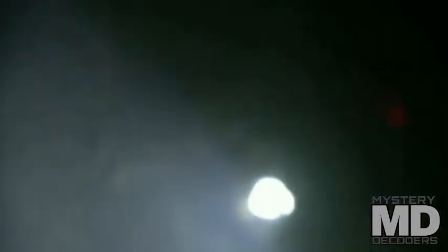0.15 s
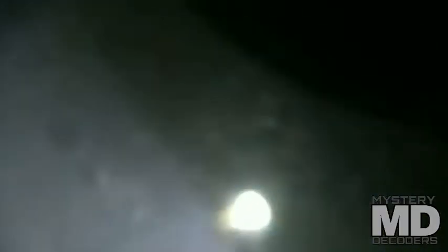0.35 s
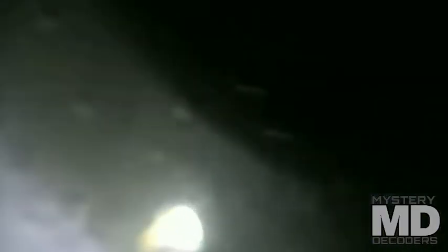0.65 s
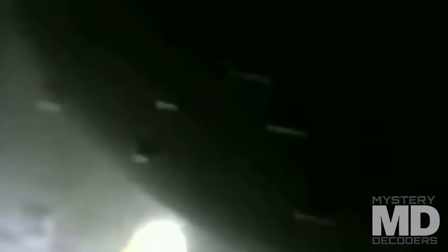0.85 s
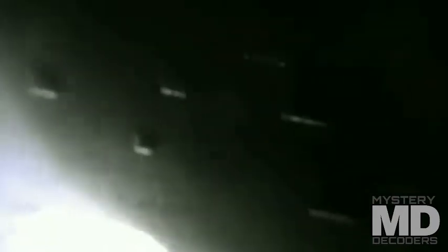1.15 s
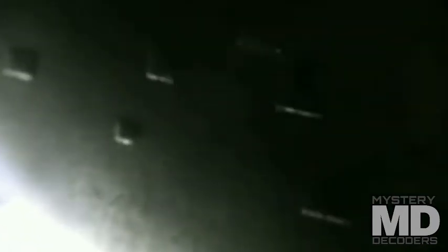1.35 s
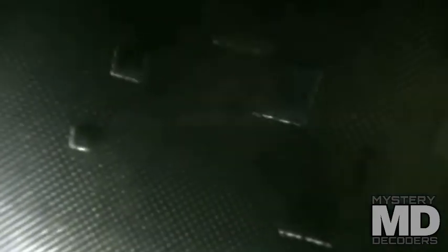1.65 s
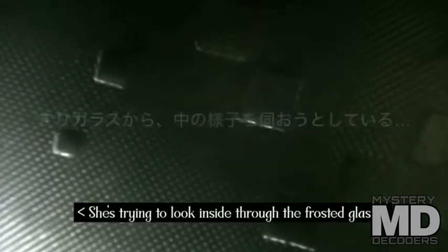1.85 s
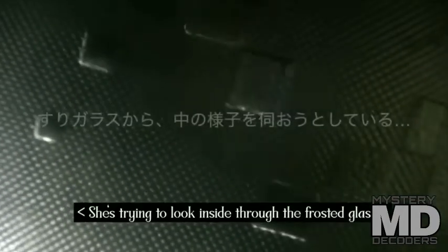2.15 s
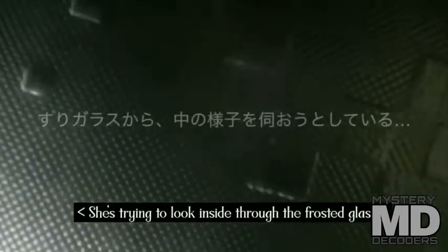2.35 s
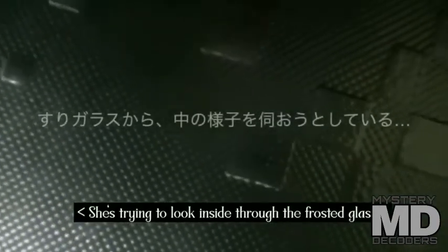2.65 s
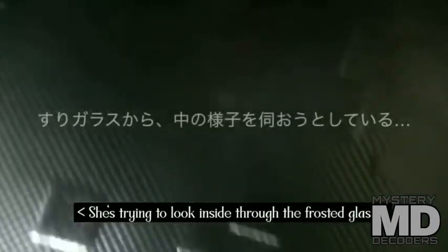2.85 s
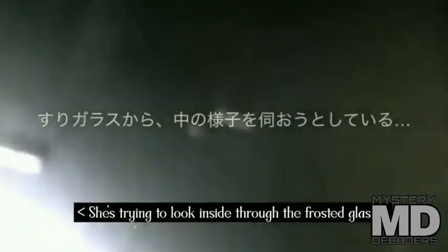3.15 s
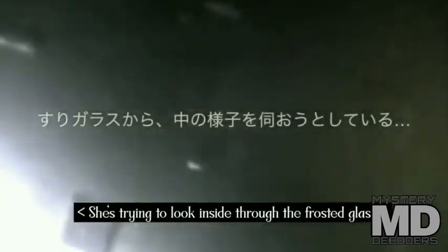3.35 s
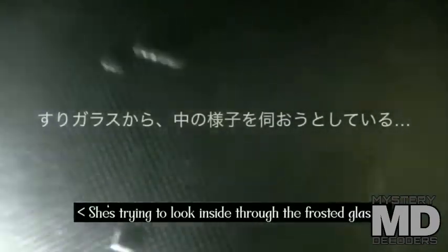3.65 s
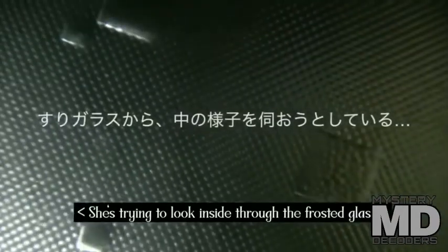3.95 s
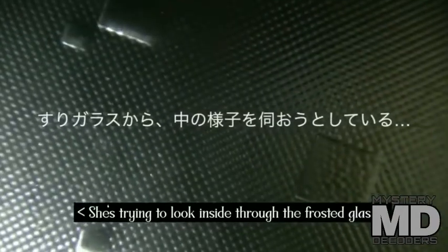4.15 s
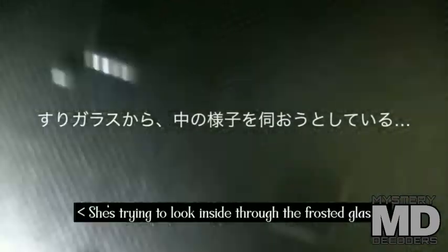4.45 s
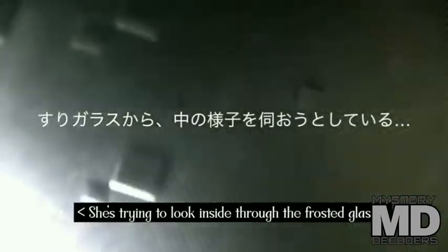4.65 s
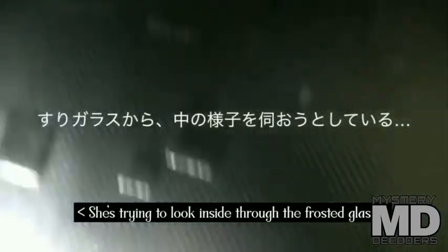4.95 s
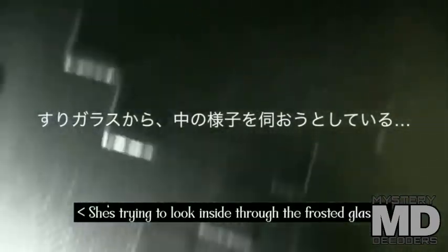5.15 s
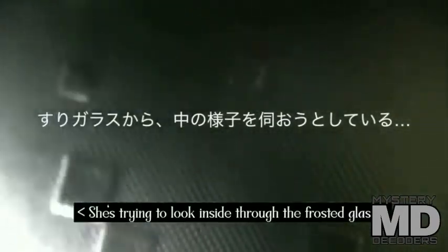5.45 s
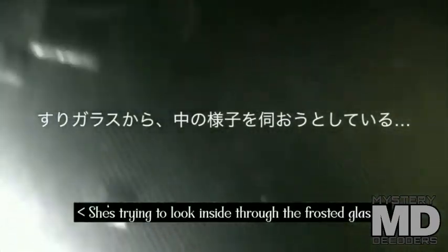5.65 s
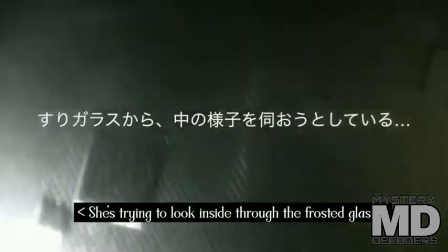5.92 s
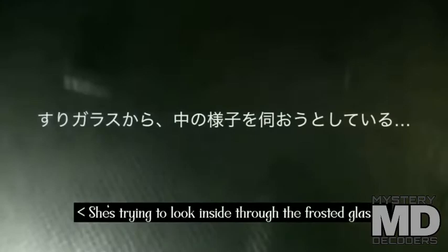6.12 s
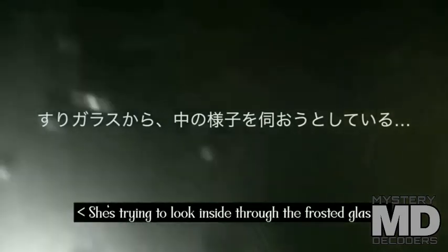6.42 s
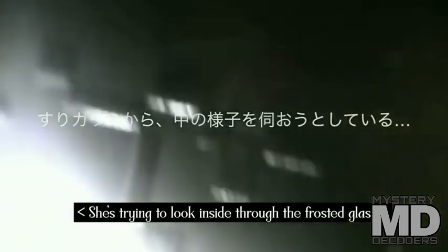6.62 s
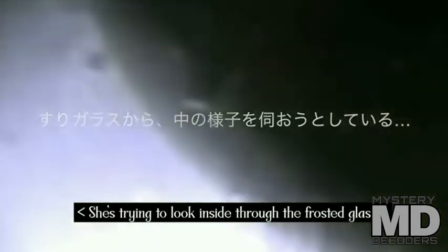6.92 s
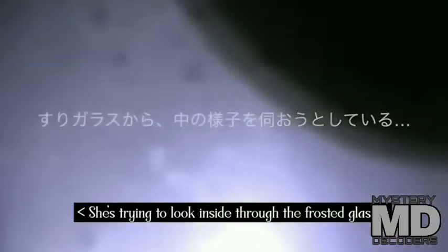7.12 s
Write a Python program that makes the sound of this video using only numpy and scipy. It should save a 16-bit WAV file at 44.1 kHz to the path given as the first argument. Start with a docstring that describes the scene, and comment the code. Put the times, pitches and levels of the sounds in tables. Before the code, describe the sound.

In a quiet building, someone tugs at a wooden sliding door right by the microphone. A slight stir gives way to a burst of hollow thuds, wooden clatter and rattling glass. After some gentler jiggling, the door is jolted hard three more times, its loose pane clicking and dragging. Dull room noise, deep handling rumble and a faint rustle and hiss lie underneath and remain when the door settles.

```python
"""Dull building noise, handling rumble, rustle and faint hiss lie under a close wooden sliding door.
The door stirs, then at 0.7 s is shaken and bumped hard: the panel booms in its low modes, the frame
clatters and a loose glass pane ticks and drags in its groove. Softer shaking follows from 2 s,
then hard bouts near 3.6, 4.9 and 5.8 s. The door rings out and the background remains."""
import sys
import numpy as np
from scipy import signal
from scipy.io import wavfile
from scipy.ndimage import uniform_filter1d

SR = 44100
rng = np.random.default_rng(int(sys.argv[2]) if len(sys.argv) > 2 else 0)


def int16_out(signal):
    """Quantize to a 16-bit WAV file."""
    q = np.round(np.clip(np.atleast_2d(signal).T, -1, 1) * 32767)
    wavfile.write(sys.argv[1], SR, q.astype(np.int16))


N = 321048


def from_db(db):
    """Decibels to gain."""
    return 10 ** (np.asarray(db) / 20)


def rms_one(x):
    """Scale to rms 1."""
    return x / np.sqrt(np.mean(x ** 2) + 1e-20)


def bandpass(x, order, edges_hz):
    """Butterworth band filter."""
    return signal.sosfilt(signal.butter(order, edges_hz, "band", fs=SR, output="sos"), x + 1e-18)


def ring(force, hz, t60):
    """One mode: a unit click sets a sine of height 1 ringing."""
    r, w = from_db(-60 / (t60 * SR)), 2 * np.pi * hz / SR
    return signal.lfilter([0, np.sin(w)], [1, -2 * r * np.cos(w), r * r], force + 1e-18)


def colour(x, spectrum):
    """Third-octave EQ that keeps white noise at about the same rms."""
    hz, level_db = np.transpose(spectrum)
    edges = np.geomspace(hz[0], hz[-1], int(3 * np.log2(hz[-1] / hz[0])) + 1)
    gains = from_db(np.interp(np.log(edges[1:] * edges[:-1]) / 2, np.log(hz), level_db))
    gains /= np.sqrt(np.sum(gains ** 2 * np.diff(edges)) * 2 / SR)
    return sum(gain * (-1) ** k * bandpass(x, 2, edges[k:k + 2]) for k, gain in enumerate(gains))


def grains(per_s, spread_db):
    """Random contacts of uneven size and sign, at rms 1."""
    sizes = from_db(spread_db * np.minimum(rng.exponential(1, N), 4)) * rng.choice([-1, 1], N)
    return rms_one(sizes * (rng.random(N) < per_s / SR))


def flicker(rate_hz, depth_db):
    """A gain that wanders at random."""
    hop = 32
    lowpass = signal.butter(2, rate_hz, fs=SR / hop, output="sos")
    wander = rms_one(signal.sosfilt(lowpass, rng.standard_normal(N // hop + 2)))
    return from_db(depth_db * np.interp(np.arange(N) / hop, np.arange(len(wander)), wander))


# Dull room tone: freq_hz, relative_db
BUILDING_EQ = [(35, -37), (60, -7), (197, -5.5), (234, -9), (447, -6.5), (661, -3.5), (719, -21),
               (1030, -7), (2070, -25.5), (3500, -46), (4550, -58), (7700, -120)]
# Hollow notes in the room tone: pitch_hz, gain_db, t60_s
BUILDING_MODES = [(631, -51, 0.11), (1093, -51.5, 0.087), (1270, -49.5, 0.18)]
def building_noise():
    """Dull noise excites faint hollow resonances."""
    air = colour(rng.standard_normal(N), BUILDING_EQ)
    air += sum(from_db(gain_db) * ring(air, hz, t60) for hz, gain_db, t60 in BUILDING_MODES)
    return flicker(16.2, 0.52) * rms_one(air)


def handling_rumble(floor_db, force):
    """Deep rumble swells with the shaking and lingers after it."""
    band_hz, linger_t60_s = [28, 58], 1.13
    power_decay = from_db(-120 / (linger_t60_s * SR))
    linger = np.sqrt(signal.lfilter([10 / SR], [1, -power_decay], force ** 2 + 1e-18))
    bed = rms_one(bandpass(rng.standard_normal(N), 3, band_hz))
    swell = bandpass(force * rng.standard_normal(N), 3, band_hz)
    return (from_db(floor_db) + from_db(-29) * linger) * bed + from_db(-6) * swell


# Fader moves of the background: time_s, building_db, rustle_db, rumble_db
BED_FADERS = [(0.0, -57.5, -75, -60), (0.2, -52, -59, -67), (0.37, -56.5, -66, -74), (0.45, -55, -67, -67),
              (1.0, -52.5, -68.5, -46), (1.3, -49.5, -75.5, -54.5), (1.5, -53, -71.5, -56),
              (2.0, -56, -77.5, -64.5), (3.38, -56.5, -72, -57.5), (4.0, -51.5, -66, -66),
              (4.12, -57, -72.5, -51), (4.25, -60, -61.5, -54), (4.4, -54.5, -62.5, -52),
              (4.45, -56.5, -76, -58), (4.65, -54, -74, -58), (4.8, -61, -73, -59),
              (5.3, -57.5, -79.5, -65), (5.5, -53.5, -72, -58), (5.62, -53.5, -74, -60),
              (6.15, -53, -64, -43), (6.43, -55, -74.5, -63), (7.28, -58.5, -68.5, -60)]
def background(force):
    """Room tone and rumble, with a grainy rustle and faint hiss on top."""
    time_s, *faders = np.transpose(BED_FADERS)
    building_db, rustle_db, rumble_db = [np.interp(np.arange(N) / SR, time_s, db) for db in faders]
    lows = from_db(building_db) * building_noise() + handling_rumble(rumble_db, force)
    rustle = rms_one(bandpass(grains(4000, spread_db=-5), 2, [1500, 4500])) * flicker(25, 0.53)
    hiss_eq = [(1180, -34), (2000, -13), (3430, -33.5), (4710, 9), (15500, 3)]  # freq_hz, relative_db
    hiss = colour(rng.standard_normal(N), hiss_eq) * flicker(3, 0.28)
    return lows + from_db(rustle_db) * rustle + from_db(-72.5) * hiss


# Bouts of shaking: start_s, rise_s, hold_s, force_db, release_db_per_s, clatter_offset_db, favoured_hz
SHAKE_BOUTS = [(0.261, 0.088, 0.026, -46.5, 399.5, 11, 345), (0.708, 0.0032, 0.1, -15, 248, -4, 206),
               (0.849, 0.0051, 0.018, -22.5, 109.5, -14, 156), (1.968, 0.044, 0.1, -44, 200, -6.5, 362),
               (2.073, 0.12, 0.09, -32.5, 193, -2.5, 195), (2.564, 0.073, 0.032, -30, 198, 0, 327),
               (2.7, 0.073, 0.025, -27.5, 702, -1.5, 212), (3.565, 0.0014, 0.13, -14.5, 235, -3, 233),
               (3.741, 0.0011, 0.022, -20, 142, -7, 250), (4.12, 0.03, 0.27, -48.5, 115.5, -1, 175),
               (4.47, 0.17, 0.0088, -46, 405.5, -27, 223), (4.923, 0.0047, 0.04, -18, 146, -16, 204),
               (5.804, 0.001, 0.06, -15.5, 162.5, -13, 172), (5.987, 0.0029, 0.097, -35.5, 215, -2.5, 185)]
def hand_shakes():
    """Each bout swells, holds and is let go; gives panel force, frame clatter and favoured pitch."""
    swell_db, clatter_loss_db_per_s, rest_hz, sag_s = 14.5, 73, 118, 0.11
    curves, t = np.zeros((3, N)), np.arange(SR) / SR
    for start, rise, hold, force_db, release, clatter_db, favoured_hz in SHAKE_BOUTS:
        at, since_release = round(start * SR), np.maximum(t - rise - hold, 0)
        force = from_db(force_db - swell_db * np.maximum(1 - t / rise, 0) - release * since_release)
        # once let go, the clatter dies first and the pitch sinks to that of the free door
        clatter = force * from_db(clatter_db - clatter_loss_db_per_s * since_release)
        pitch = rest_hz + (favoured_hz - rest_hz) * np.exp(-since_release / sag_s)
        curves[:, at:at + SR] += force, clatter, force * pitch
    force, clatter, weighted_pitch = curves
    return force, clatter * flicker(29, 1.2), weighted_pitch / (force + 1e-20)


def nearness(hz, favoured_hz, octaves):
    """Where the door is held or struck decides which modes answer: those near the favoured pitch."""
    return 1 / (1 + (np.log2(hz / np.maximum(favoured_hz, 1)) / octaves) ** 2)


# Modes of the wooden panel: pitch_hz, gain_db, t60_s
PANEL_MODES = [(59.5, -3, 0.23), (113.6, -4.5, 0.6), (147.6, 2.5, 0.2), (167.1, -1.5, 0.13),
               (177.4, -5, 0.39), (203.4, -0.5, 0.17), (247.2, 1, 0.13), (278, -2.5, 0.25), (312.6, 5, 0.1),
               (364.3, 5.5, 0.15), (514, -9, 0.1), (449, -5, 0.12), (576, 4, 0.015), (589, -18, 0.067),
               (666.3, -10, 0.14), (786, -13, 0.2), (1028, -6.5, 0.062), (1153, -8.5, 0.058)]
def panel_boom(force, clatter, ticks, favoured_hz):
    """Rough shaking drives the twelve low modes; clatter and ticks knock the upper ones."""
    rough, boom = rng.standard_normal((2, N)), np.zeros(N)
    for k, (hz, gain_db, t60) in enumerate(PANEL_MODES):
        if k < 12:
            drive = from_db(-37) * force * nearness(hz, favoured_hz, octaves=0.73) * rough[k % 2]
        else:
            drive = from_db(-36) * clatter * rough[k % 2] + from_db(-24) * ticks
        boom += (-1) ** k * from_db(gain_db) * ring(drive, hz, t60)
    return boom


# Woody tone of the frame: freq_hz, relative_db
FRAME_EQ = [(240, -40), (400, 2.5), (912, -3.5), (1140, -6), (3600, -18.5), (5000, -24), (6500, -44),
            (11000, -120)]
def frame_clatter(clatter, ticks):
    """The frame sounds under its own rattling contacts and under every tick of the pane."""
    rattle = from_db(-10.5) * clatter * grains(1500, spread_db=3)
    return colour(rattle + from_db(-1) * ticks, FRAME_EQ)


# The door hits its frame: start_s, level_db, favoured_hz, crack_offset_db
DOOR_HITS = [(0.716, -6.5, 199, -3.5), (0.734, -11.5, 393, -21), (0.789, -6.5, 203, -13),
             (0.858, -32, 170, 2), (0.88, -17.5, 173, -10), (0.907, -15.5, 132, -44),
             (2.195, -27, 413, 6.5), (2.22, -22, 174, -39), (2.24, -30, 202, -20), (2.297, -24, 182, -32),
             (2.612, -32, 324, -25), (2.746, -30.5, 149, -21), (2.776, -18.5, 264, -9),
             (2.793, -21.5, 166, -12), (3.543, -31, 325, 4), (3.57, -8, 300, -1), (3.61, -9.5, 264, -10),
             (3.627, -9.5, 199, -12), (3.641, -11, 240, -10.5), (3.747, -9.5, 278, -15),
             (3.838, -14, 114, -17), (3.97, -23.5, 270, -7.5), (3.994, -18.5, 120.4, -37),
             (4.249, -36.5, 280, -5), (4.541, -48, 294, 0), (4.931, -16, 216, -8),
             (4.96, -16, 161.5, -10.5), (5.03, -27.5, 165.5, -8.5), (5.07, -27.5, 172, -5),
             (5.734, -48.5, 404, 6.5), (5.808, -4, 155.5, -24.5), (5.823, -24, 164, -3),
             (5.878, -13.5, 148, -13.5), (5.978, -15.5, 236, -19), (6.011, -13, 189, -17),
             (6.042, -15.5, 230, -5.5), (6.186, -51.5, 404, 8.5)]
def door_bumps():
    """A bump strikes every panel mode, with a hard snap and a brief crack at the front."""
    held_t60_share, choke_db_per_s, free_t60_s, detune_share = 0.73, 301.5, 0.64, 0.015
    hz, gain_db, t60 = np.transpose(PANEL_MODES)[:, :, None]
    chance = rng.standard_normal((len(DOOR_HITS), 2, len(PANEL_MODES), 1))
    next_starts = [hit[0] for hit in DOOR_HITS[1:]] + [N / SR]
    (boom, crack_envelope, snap), t = np.zeros((3, N)), np.arange(SR // 2) / SR
    attack = 1 - np.exp(-t / 0.0012)
    for hit, (scatter, shift), next_start in zip(DOOR_HITS, chance, next_starts):
        start, level_db, favoured_hz, crack_db = hit
        at = round(start * SR)
        strength = from_db(level_db - 8.5 + gain_db + 1.5 * scatter)
        strength *= nearness(hz, favoured_hz, octaves=0.36) ** 2
        # the hand damps the ring and the next bump chokes it; a weaker part escapes both
        choke_db = choke_db_per_s * np.maximum(t + start - next_start, 0)
        held = from_db(-60 * t / (t60 * held_t60_share) - choke_db)
        free = from_db(-9.5 - 60 * t / np.minimum(free_t60_s, 3 * t60))
        tones = np.sin(2 * np.pi * hz * (1 + detune_share * shift) * t)  # the grip shifts each mode
        boom[at:at + len(t)] += np.sum(strength * attack * (held + free) * tones, axis=0)
        snap[at] = from_db(level_db + crack_db + 7)
        crack_envelope[at:at + len(t)] += from_db(level_db + crack_db - 14.5 - 60 * t / 0.08)
    crack = crack_envelope * grains(8000, spread_db=-6.5) + snap
    knock = sum(from_db(gain_db - 15) * ring(crack, hz, t60) for hz, gain_db, t60 in PANEL_MODES[10:])
    snap_edge = from_db(-6) * bandpass(snap, 1, [300, 2513])
    return boom + knock + colour(crack, FRAME_EQ) + snap_edge


# The pane ticks in its groove: start_s, level_db
PANE_TICKS = [(0.719, -14), (0.733, -8.5), (0.748, -6.5), (0.7698, -11), (0.7845, -9), (0.7904, -14),
              (0.802, -15), (0.827, -13), (0.856, -22.5), (0.88, -20), (1.344, -46), (1.403, -48),
              (1.44, -42), (1.494, -45.5), (1.56, -40), (1.573, -36.5), (1.642, -45), (1.8402, -43),
              (1.851, -44), (1.964, -45), (2.0244, -37), (2.083, -32.5), (2.1253, -27.5), (2.1984, -17),
              (2.26, -28), (2.274, -26.5), (2.2848, -26.5), (2.2923, -27), (2.581, -25), (2.615, -25),
              (2.6485, -23.5), (2.667, -33), (2.794, -32), (2.778, -31), (3.5427, -38), (3.5727, -9),
              (3.583, -11.5), (3.589, -6.5), (3.603, -8), (3.625, -9), (3.645, -14.5), (3.6535, -10.5),
              (3.659, -20), (3.663, -13), (3.684, -19.5), (3.695, -19.5), (3.7173, -16.5), (3.739, -24.5),
              (3.7484, -8.5), (3.771, -27), (3.777, -22), (3.8431, -28.5), (3.8518, -22), (3.8726, -36),
              (3.8875, -28.5), (4.134, -41), (4.931, -20.5), (4.949, -12.5), (5.731, -44), (5.808, -32),
              (5.8242, -12), (5.843, -13), (5.8595, -14), (5.876, -23), (6.0097, -27), (6.0282, -21.5)]
def pane_ticks():
    """A hard contact, then a dying burst of tiny ones along the glass edge; loud ticks last longer."""
    (burst, snap), t = np.zeros((2, N)), np.arange(SR // 8) / SR
    attack = 1 - np.exp(-t / 0.00033)
    for start, level_db in PANE_TICKS:
        at, t60 = round(start * SR), np.clip(0.027 + 0.0004 * level_db, 0.01, 0.1)
        burst[at:at + len(t)] += attack * from_db(level_db - 13 - 60 * (t / t60) ** 1.374)
        snap[at] = from_db(level_db + 3.5)
    return burst * grains(16000, spread_db=1) + snap


# Bright tone of the pane: freq_hz, relative_db
GLASS_EQ = [(880, -23), (1500, -4), (2070, -6), (3690, -9), (5400, -1), (8050, 0.5), (15500, -14.5)]
# Short modes of the pane: pitch_hz
GLASS_MODES = [1460, 1910, 2470, 3240, 4020, 4830, 5310, 6220, 6990, 7820, 8220, 8500, 9040]
def glass_ring(ticks, drags):
    """The pane colours its contacts; its modes come and go as the contact point shifts."""
    drive = drags + from_db(-8) * ticks  # a tick seats the pane, so it rings less than a drag
    gains = from_db(-31 + np.interp(GLASS_MODES, *np.transpose(GLASS_EQ)))
    modes = sum(gain * ring(flicker(10, 4) * drive, hz, t60=0.022) for hz, gain in zip(GLASS_MODES, gains))
    return colour(ticks + drags, GLASS_EQ) + modes


# The pane drags along its groove: start_s, length_s, level_db, ramp_db
PANE_DRAGS = [(0.893, 0.15, -67, -0.5), (1.33, 0.12, -71, 3), (1.513, 0.041, -68.5, 3),
              (1.795, 0.024, -65, -3), (1.973, 0.13, -59.5, -2), (2.098, 0.17, -53.5, -0.5),
              (2.3, 0.044, -69, -1), (2.19, 0.048, -35, -18), (2.523, .034, -64, 3),
              (2.571, 0.0081, -50, -5), (2.6, 0.19, -49, -2), (3.951, 0.06, -58, -17),
              (4.128, 0.018, -62, -7), (4.246, 0.023, -38, -20), (4.966, 0.1, -51.5, -7.5),
              (5.063, 0.11, -49, -21), (5.807, 0.12, -44, -7), (5.982, 0.019, -53, -19),
              (6.011, 0.066, -41.5, -2), (6.147, 0.045, -59, -5)]
def pane_drags(clatter):
    """Dense, uneven friction that starts and stops abruptly."""
    envelope = from_db(-29) * clatter  # the pane also buzzes with the frame
    for start, length, level_db, ramp_db in PANE_DRAGS:
        at, n = round(start * SR), round(length * SR)
        envelope[at:at + n] += from_db(level_db + np.linspace(0, ramp_db, n))
    return uniform_filter1d(envelope, size=130) * flicker(63, 0.42) * grains(12000, spread_db=4)


def scene():
    """Frame, panel and glass over the background, in mono."""
    force, clatter, favoured_hz = hand_shakes()
    ticks = pane_ticks()
    wood = frame_clatter(clatter, ticks) + panel_boom(force, clatter, ticks, favoured_hz) + door_bumps()
    glass = glass_ring(ticks, pane_drags(clatter))
    return (wood + glass + background(force))[None]


def record(dry):
    """Soft clipping rounds the peaks; a steep low-pass cuts the very top."""
    ceiling, stopband_hz = 0.8, 16854
    lowpass = signal.cheby2(12, 70, stopband_hz, fs=SR, output="sos")
    return signal.sosfilt(lowpass, ceiling * np.tanh(dry / ceiling))


dry = scene()
out = record(dry)
int16_out(out)
```